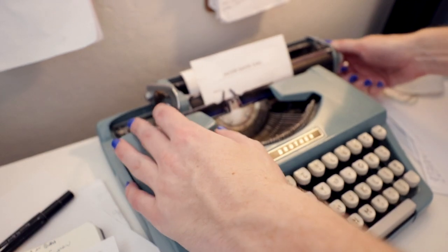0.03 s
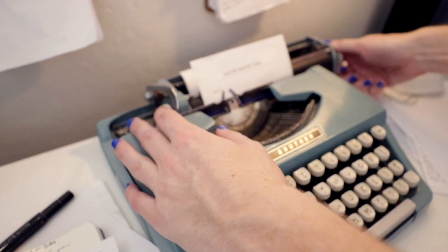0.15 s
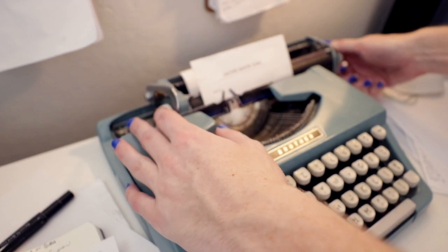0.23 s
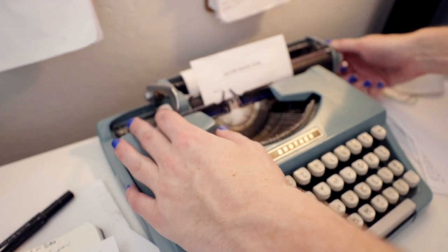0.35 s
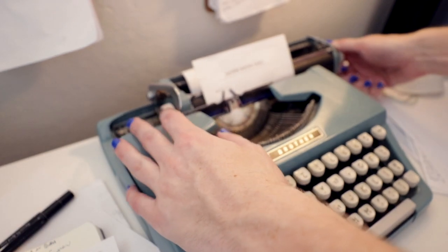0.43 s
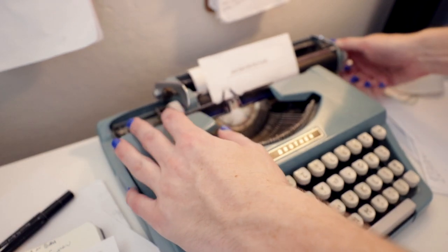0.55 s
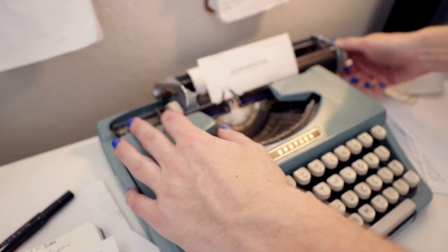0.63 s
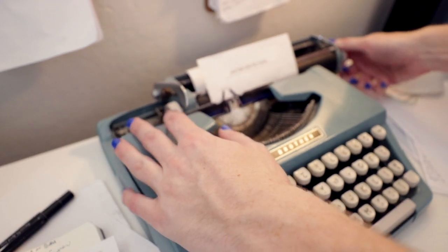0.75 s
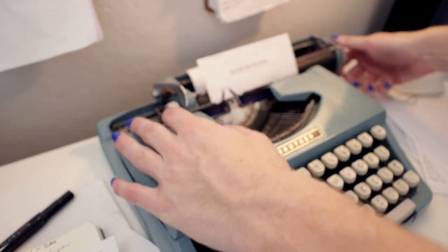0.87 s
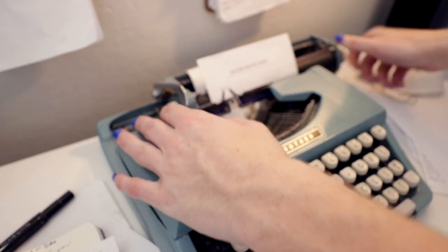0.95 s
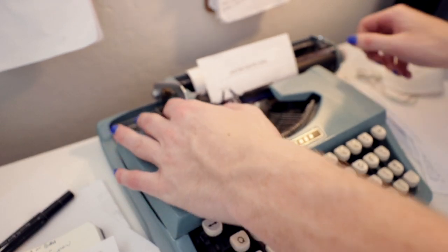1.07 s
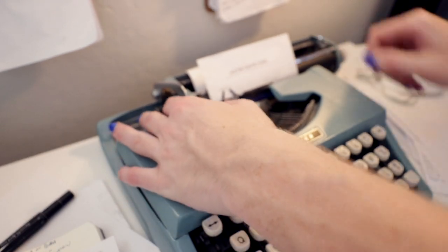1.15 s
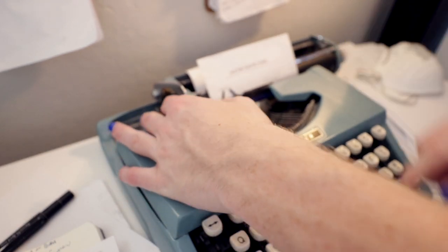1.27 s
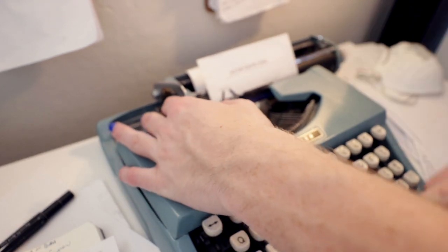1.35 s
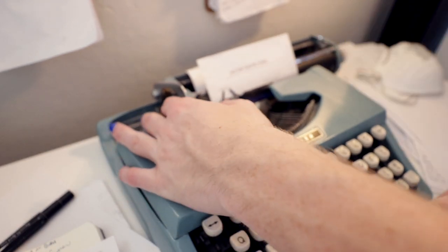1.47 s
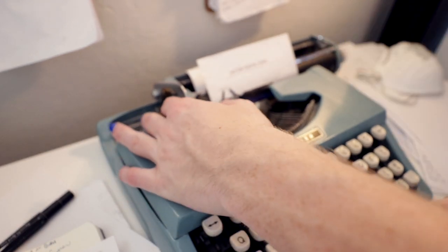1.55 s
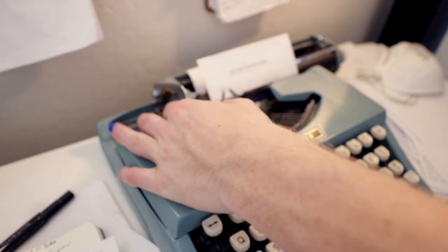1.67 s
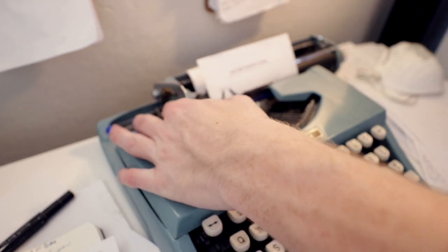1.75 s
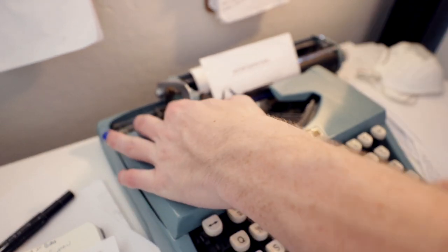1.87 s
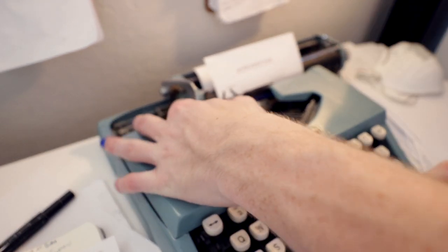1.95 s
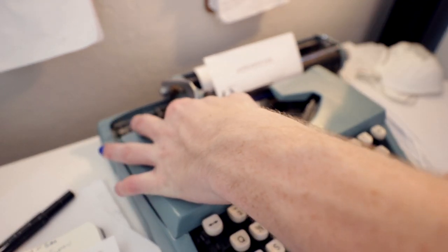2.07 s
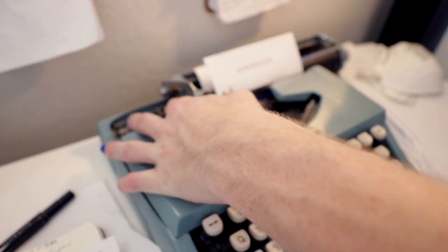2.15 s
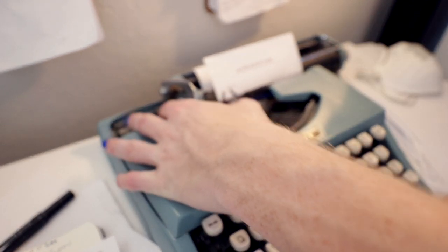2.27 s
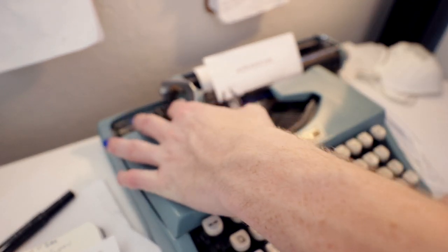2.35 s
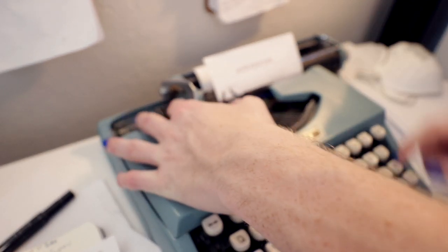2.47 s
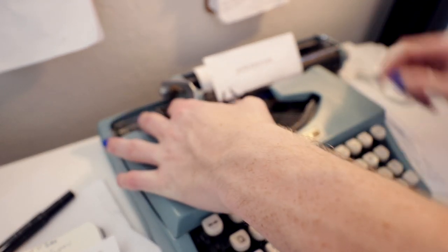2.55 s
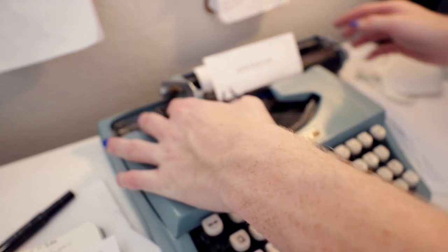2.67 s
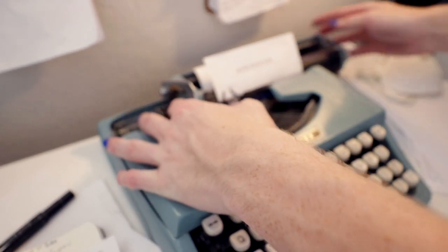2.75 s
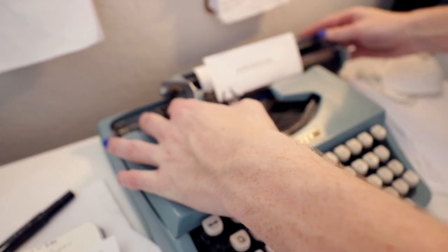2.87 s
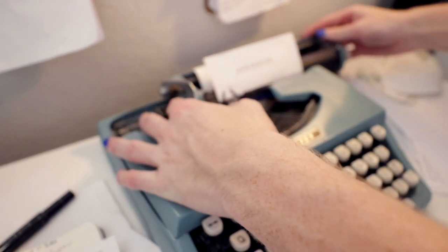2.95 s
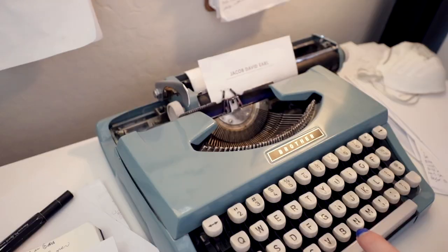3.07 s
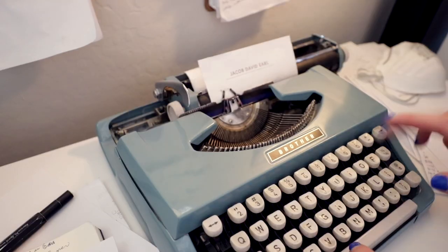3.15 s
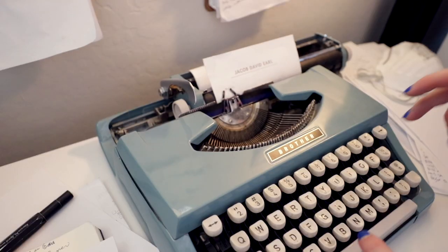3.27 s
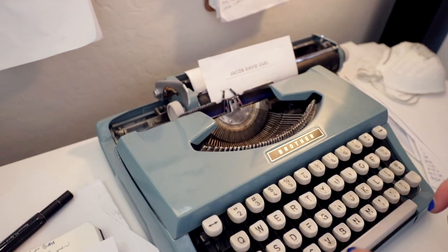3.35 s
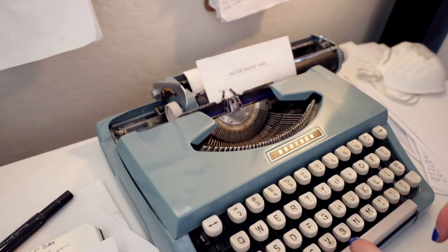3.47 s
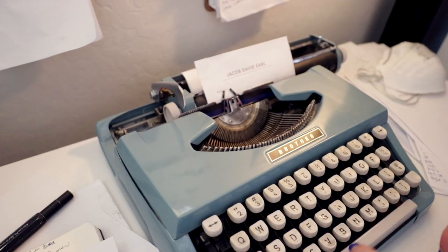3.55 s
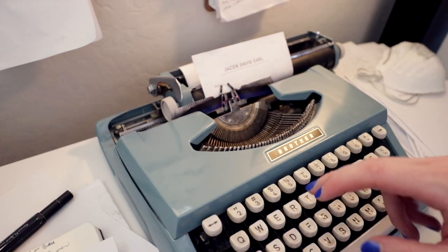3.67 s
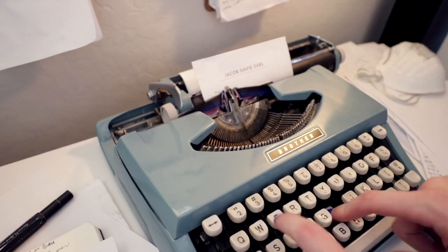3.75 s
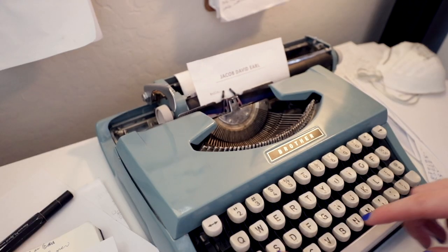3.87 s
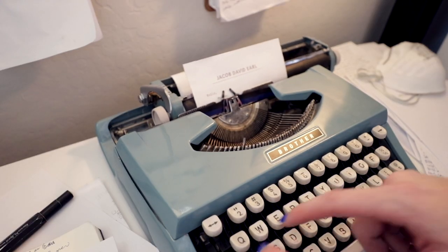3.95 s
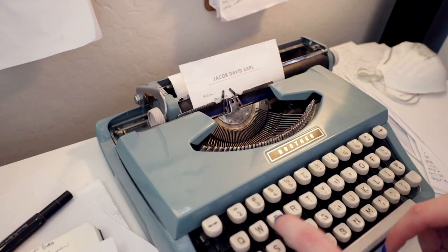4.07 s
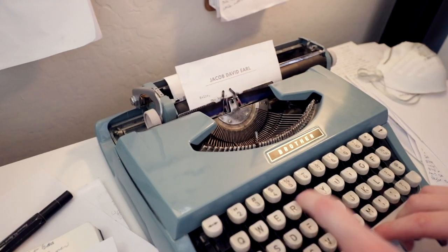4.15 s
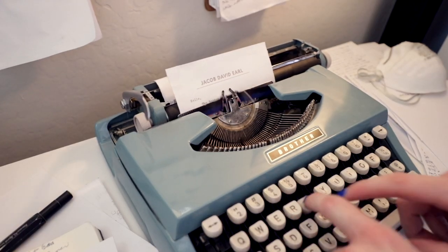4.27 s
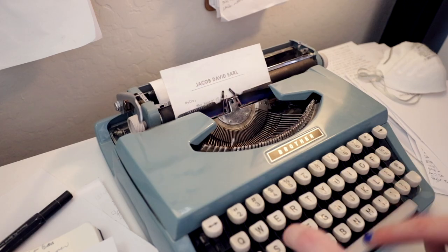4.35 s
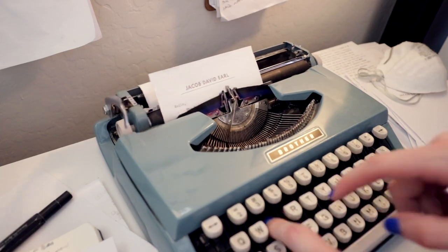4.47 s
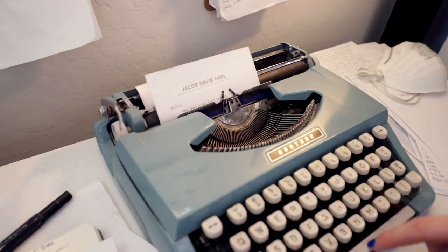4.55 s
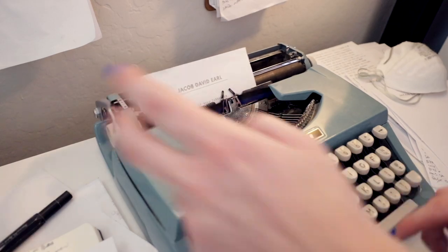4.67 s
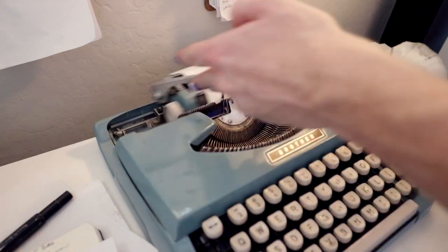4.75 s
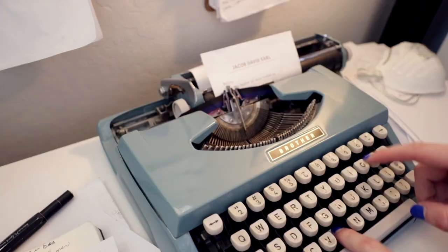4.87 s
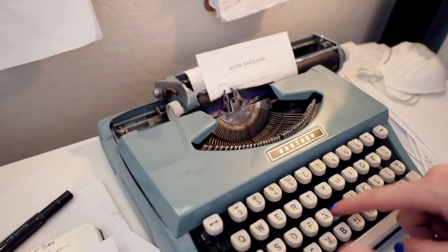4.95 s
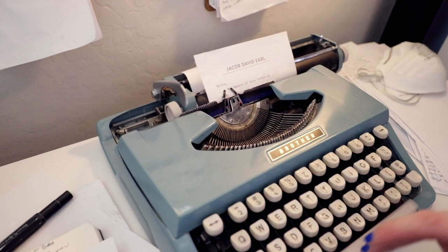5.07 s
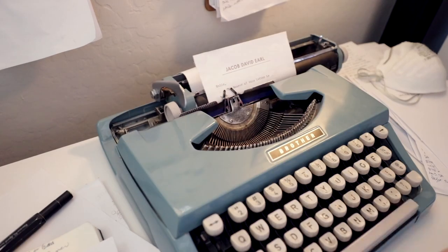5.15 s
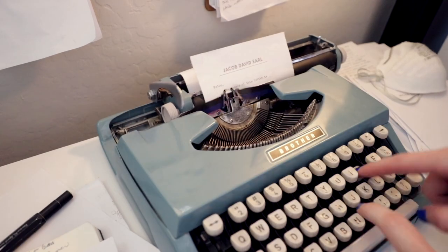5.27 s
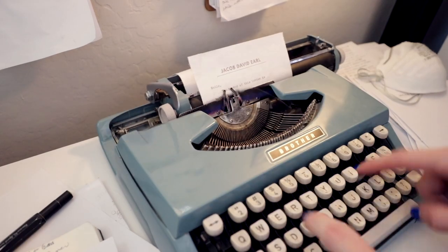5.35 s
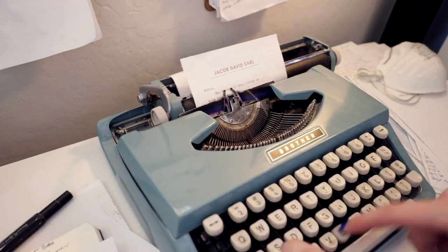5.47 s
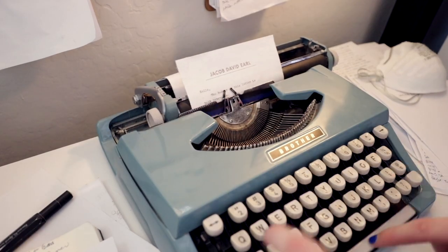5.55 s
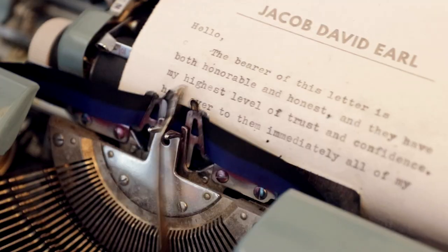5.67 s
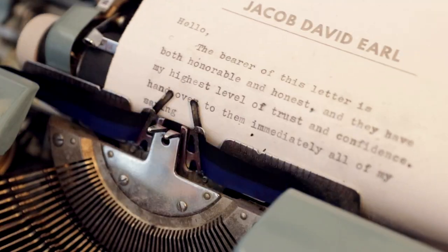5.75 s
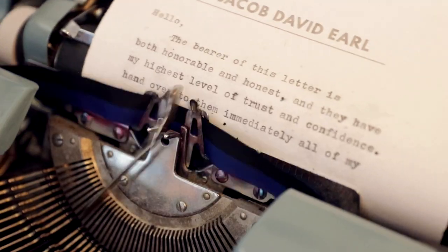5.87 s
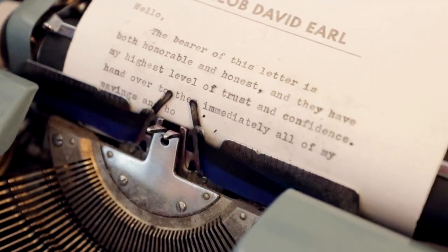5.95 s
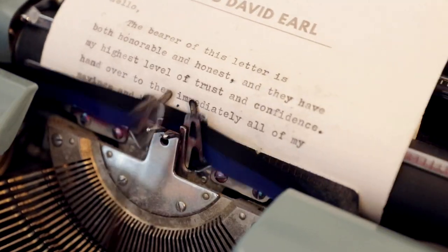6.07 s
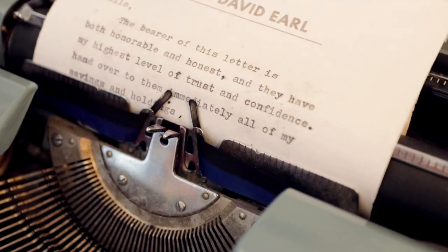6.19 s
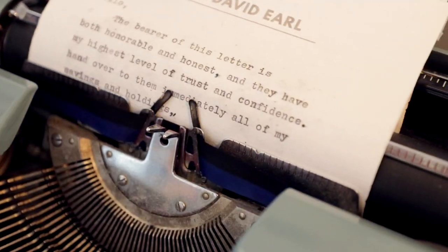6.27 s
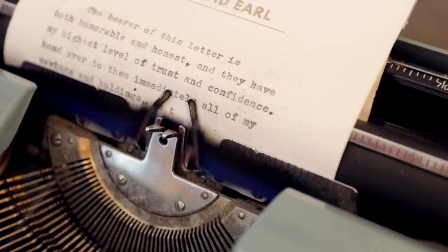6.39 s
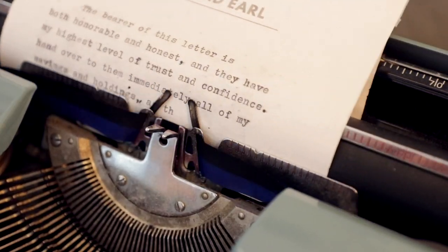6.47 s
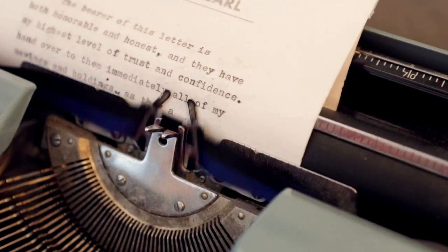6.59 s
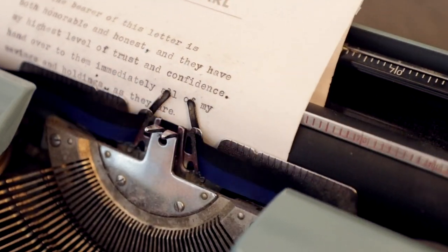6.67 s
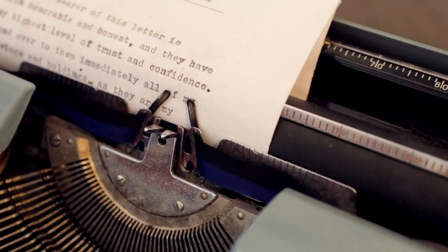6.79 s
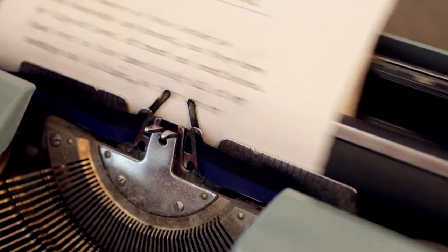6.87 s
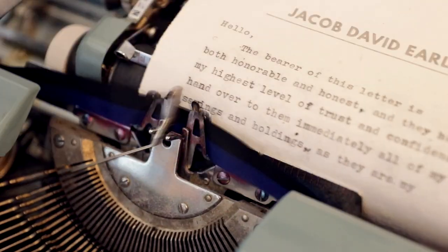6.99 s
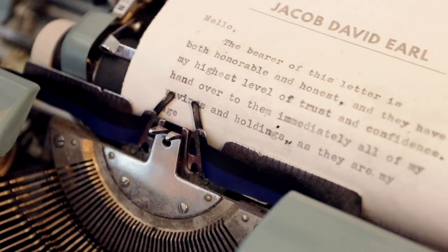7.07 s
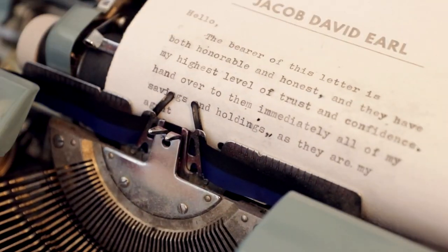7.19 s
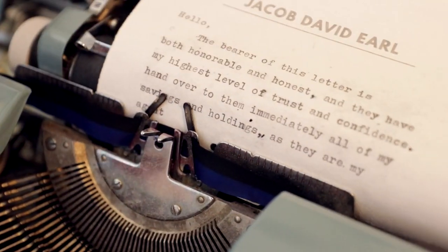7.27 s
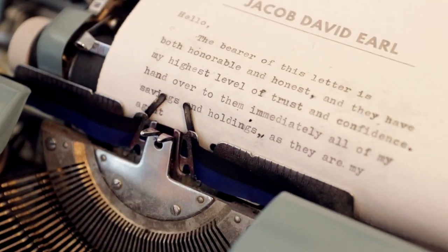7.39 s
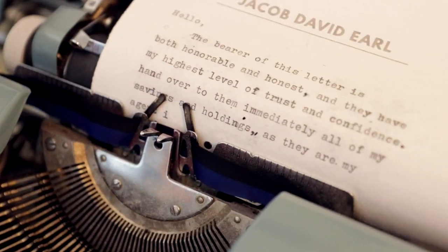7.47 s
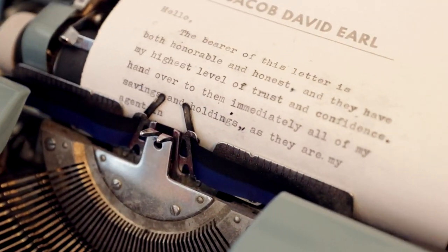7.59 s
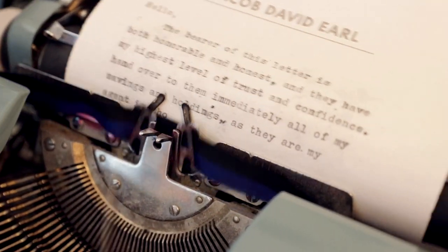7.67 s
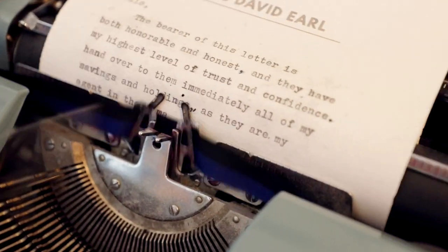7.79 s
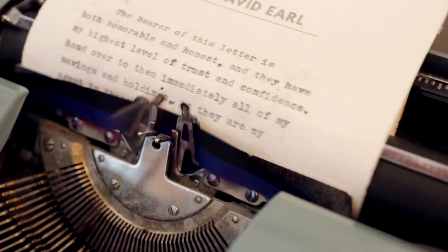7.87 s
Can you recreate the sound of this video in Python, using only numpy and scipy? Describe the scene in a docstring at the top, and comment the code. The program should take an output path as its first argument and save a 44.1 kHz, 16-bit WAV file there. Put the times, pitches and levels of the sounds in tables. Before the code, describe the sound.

Sparse clicks and carriage knocks on a small mechanical typewriter give way to rapid, uneven typing, sharp metal type bars slapping the roller.

```python
"""Low room rumble with faint hum; hands rustle and knock a manual typewriter's carriage, heard from a little
way off. Then quick runs of keys: levers chatter and springs sizzle (noise bursts), type bars slap the platen
(shaped noise bands plus struck modes), all but the room, desk, rail and spring sizzle through the frame's
resonances. The typing is spliced from short pieces, so rings stop dead at the cuts; the last pieces are heard
from beside the type basket."""
import sys
import numpy as np
from scipy import signal
from scipy.fft import rfft, irfft
from scipy.io import wavfile

SR = 44100
rng = np.random.default_rng(int(sys.argv[2]) if len(sys.argv) > 2 else 0)


def inscribe(sig):
    """Save sig as 16-bit PCM at rate SR to the path in sys.argv[1].

    A 1-D sig is mono; a 2-D sig holds one channel per row.
    Samples are clipped to [-1, 1] before scaling.
    """
    pcm = np.round(np.clip(np.atleast_2d(sig).T, -1, 1) * 32767)
    wavfile.write(sys.argv[1], SR, pcm.astype(np.int16))


N = 349713
AGE_S = np.arange(SR // 2) / SR  # time since onset, for every struck sound

# Room colour: (frequency [Hz], level [dB])
ROOM_COLOUR = [(18, -59), (30, -34.5), (56, -28), (79, 3), (127, -5.5), (221, -12.5), (404, -10.5),
               (486, -20), (526, -17.5), (889, -22), (3060, -26.5), (3490, -30), (3980, -27.5), (6210, -38),
               (16000, -50)]
# Hum and whine: (frequency [Hz], level [dB])
HUM_TONES = [(75.4, -67.5), (118.4, -67), (403.7, -72), (3709, -81), (3895, -85), (4091, -80), (7424, -94)]
# Desk booms of their own: a hand bumping the desk top, and booms with two key strokes: (time [s], level [dB])
DESK_BOOMS = [(2.838, -46), (4.511, -36), (5.5, -39)]
# Carriage rail scraping: (start [s], end [s], level the scrape swells to [dB])
RAIL_SLIDES = [(3.165, 3.328, -62), (4.764, 4.862, -61), (6.873, 7.023, -60)]
# Rail resonances: (frequency [Hz], width per filter pass [Hz], level [dB])
RAIL_MODES = [(930, 210, -13), (2260, 85, -6), (2580, 180, -12), (2680, 160, -11)]
# Frame and type basket resonances: (frequency [Hz], width [Hz], gain [dB])
FRAME_MODES = [(133.6, 45, 1.5), (278, 69, -5), (610, 79, -7.5), (843, 55, -11.5), (1040, 32, -3),
               (2060, 100, -16.5), (2566, 21, -4.5), (2970, 120, -2.5), (3144, 57, -0.5), (3963, 220, -6),
               (5080, 83, -6.5), (6630, 250, -13.5), (7460, 53, -25.5)]
# Splices where ringing stops: (time [s])
CUT_TIMES_S = [3.44, 3.486, 3.9, 3.947, 4.051, 4.1, 4.557, 4.665, 4.716, 5.016, 5.066, 5.738, 6.197, 6.35,
               6.702, 7.135, 7.196, 7.6]
# Clicks of catches, escapement, bars dropping back: (time [s], level [dB], sparkle [dB])
LONE_CLICKS = [(0.434, -37, -37), (0.656, -37.5, -11), (0.862, -40, -31), (1.142, -45.5, -16),
               (1.832, -40, -17), (1.867, -38, -21), (2.009, -30, -27), (3.299, -36.5, -0.5),
               (3.63, -38.5, -21), (3.94, -34, -12), (5.051, -36, -16), (5.062, -28.5, -9),
               (5.62, -18.5, -19), (6.343, -46, -9), (6.559, -30.5, -20), (6.791, -38.5, -9.5),
               (7.191, -43, -10), (7.685, -22, -30.5), (7.713, -31.5, -11), (7.744, -32, -22)]
# Fingers fiddling with the carriage: (start [s], end [s], rustle level [dB])
FIDDLING_SPANS = [(0, 0.073, -61), (0.411, 0.6, -65.5), (1.844, 1.962, -61.5)]
# Levers and carriage moving, no bar striking: (start [s], length [s], level [dB], spring sizzle [dB])
LEVER_MOVES = [(3.052, 0.016, -59, -15), (3.103, .24, -56, -28), (3.39, 0.065, -58, -10),
               (3.458, 0.037, -50.5, 5), (3.821, 0.066, -52.5, -5), (4.051, 0.037, -53, -18),
               (4.08, 0.019, -40.5, -12), (4.128, 0.092, -50.5, -15), (4.462, 0.056, -49.5, -8),
               (4.578, 0.015, -45, -7), (4.68, 0.026, -39, -5), (4.732, 0.021, -55, -13),
               (4.8, 0.064, -53, -28), (5.315, 0.022, -44.5, -19), (5.349, 0.034, -57.5, -20),
               (5.595, 0.074, -43.5, -14), (5.676, 0.069, -55.5, 3), (5.755, 0.031, -41, -1),
               (5.79, 0.055, -51.5, -15), (6.819, 0.029, -45.5, 3.5), (6.88, 0.13, -62.5, -27),
               (6.948, .08, -58.5, -27), (7.087, 0.049, -62, -5), (7.569, 0.018, -63, -6),
               (7.713, 0.064, -54, -18)]
# Lever chatter colour, from afar and beside the basket: (frequency [Hz], level [dB])
LINKAGE_FAR_COLOUR = [(29, -34.5), (50, -7.5), (180, -1), (472, -7.5), (1050, -1.5), (1500, -4.5),
                      (2210, -2.5), (3100, -11), (3500, -12), (3950, -11), (5670, -15.5), (10100, -21.5),
                      (13500, -22), (16000, -33.5)]
LINKAGE_CLOSE_COLOUR = [(29, -36), (50, -4.5), (252, 4), (802, 1), (1020, 5.5), (1470, 0), (2110, 1),
                        (2440, -3.5), (2750, 1), (3500, -15), (4240, -7), (8340, -15.5), (14200, -20),
                        (16000, -10)]
# Return spring colour: (frequency [Hz], level [dB])
SPRING_COLOUR = [(5000, -30), (9000, -10), (12000, -4), (14000, -1), (15800, 0)]
# Carriage, platen knob, space bar knocking the frame:
# (time [s], level [dB], thud [dB], case [dB], sparkle [dB], base ring t60 [s])
FRAME_KNOCKS = [(0.129, -29.5, -17, -13, -23.5, 0.12), (0.679, -34.5, -9.5, -15.5, -20, 0.19),
                (1.95, -18, -18.5, -14.5, -17, 0.2), (2.139, -37.5, -14, -15.5, -21, 0.11),
                (3.068, -22, -18.5, -16.5, -18, 0.17), (3.339, -24.5, -21, -19.5, -18, 0.22),
                (3.42, -24, -20.5, -15.5, -21.5, 0.082), (3.786, -27, -15.5, -13.5, -20.5, 0.16),
                (3.825, -23.5, -22.5, -9.5, -23.5, 0.08), (4.59, -14, -30.5, -21, -15.5, 0.11),
                (4.953, -31.5, -8.5, -15, -17, 0.3)]
# Long carriage modes: (frequency [Hz], mean level [dB], t60 [s])
CARRIAGE_MODES = [(86.2, -30, 0.6), (164, -11, 0.13), (628, -14.5, 0.38), (1050, -18, 0.31),
                  (1495, 4, 0.12), (1697, 4.5, 0.15), (2170, -1.5, 0.19), (2620, -35, 0.28),
                  (3070, -6.5, 0.028), (4000, -11.5, 0.38), (5050, -16, 0.27), (6600, -9, 0.17),
                  (6137, -16, 0.26), (6820, -30, 0.14)]
# Blow colour: (frequency [Hz], level [dB])
BLOW_COLOUR = [(29, -36), (50, -16), (148, -9), (472, -6), (1050, -1), (1580, -5.5), (1870, 1.5),
               (3030, -5), (3500, 0.5), (4040, -4), (4350, -4), (6870, -8), (16000, -19)]
# Edges between thud, case, steel and sparkle: (frequency [Hz])
BLOW_EDGES_HZ = [50, 400, 1500, 6000, 17000]
# Key strokes: (hit time [s], level [dB], bar pitch [Hz], after-ring [dB], key travel before hit [s],
# take-up tick [dB], linkage chatter [dB])
KEY_STRIKES = [(3.471, -13, 6500, -12, 0.025, -40, -50.5), (4.04, -16.5, 1870, -29, 0.048, -28, -42.5),
               (4.245, -17, 1886, -10, 0.014, -24, -46.5), (4.311, -13, 1680, -13, 0.024, -39, -44.5),
               (4.343, -14, 1820, -7, 0.02, -34, -48), (4.422, -15, 1866, -6.5, 0.034, -23.5, -45),
               (4.519, -13.5, 1850, -4.5, 0.027, -25, -39), (4.922, -21, 4100, -3, .027, -48, -52.5),
               (5.434, -14.5, 4130, -6, 0.032, -34, -41.5), (5.503, -14, 3980, -4.5, 0.022, -38, -48),
               (5.556, -14.5, 3990, -4, .02, -36, -48), (5.862, -21, 4060, -5, 0.036, -25, -48.5),
               (5.947, -22, 4000, -25, 0.023, -30.5, -54), (6.004, -25, 2160, -40, 0.022, -33, -53),
               (6.081, -18.5, 3030, -30, 0.03, -28.5, -51), (6.096, -21.5, 2940, -35, .01, -42, -80),
               (6.149, -25.5, 2270, -29, 0.027, -36, -55), (6.278, -18.5, 2920, -19, .028, -35.5, -44.5),
               (6.434, -20, 2917, -12, 0.046, -49, -46), (6.587, -26.5, 2400, -25, .042, -23.5, -50),
               (6.667, -14.5, 2890, -14.5, 0.036, -38, -50.5), (7.035, -18, 1930, -9.5, 0.034, -47, -56.5),
               (7.467, -23.5, 2405, -17.5, 0.0062, -38, -54),
               (7.647, -18.5, 4200, -10.5, 0.027, -42, -48.5), (7.826, -17, 2970, -9, 0.032, -39, -47),
               (7.9, -15, 3060, -12, 0.028, -25, -42.5)]

TYPING_FROM_S, CLOSE_FROM_S = 3.486, 5.745  # typing; view from beside the basket
TOP_HZ = 16000
# Room quieter under typing, quietest beside the basket
ROOM_DB, ROOM_TYPING_DB, ROOM_CLOSE_DB = -61, -5.5, -14
DESK_LAG_S, DESK_DB = 0.013, -3.5  # desk after each knock; level re its thud
RATCHET_FROM_S, TOOTH_S, TOOTH_DB = 3.203, .037, -27.5  # platen knob turned
TICK_SPARKLE_DB = -14.5  # re tick
JOLT_DB = 12.5  # tick starting a move, re its level
# Fiddling ticks and sizzle re the rustle
FIDDLE_GAP_S, FIDDLE_TICK_DB, FIDDLE_SPREAD_DB, FIDDLE_SIZZLE_DB = 0.074, 14, 3.5, -34
# Levers follow through, then fall back more quietly (re travel chatter)
FOLLOW_S, RETURN_S, RETURN_DB = 0.024, 0.037, -12
SIZZLE_FAR_DB, SIZZLE_CLOSE_DB = -10.5, -1  # before SIZZLE_TRIM_DB, as are the table values
SIZZLE_TRIM_DB = -1.5
# Soft strokes: relatively more case, less sparkle (slopes in dB per dB)
SOFT_BELOW_DB, SOFT_CASE_SLOPE, SOFT_SPARKLE_SLOPE = -20, 1.83, 0.66
CASE_DB, SPARKLE_FAR_DB, SPARKLE_CLOSE_DB = -21, -15.5, -15.5  # re a firm stroke
BAR_RING_DB, BAR_RING_S = -16.5, 0.12  # bar's note re after-ring; t60
THUD_DB, THUD_SLOPE = -21.5, 0.3  # re stroke; plus dB per dB of after-ring


def amp(db):
    """Decibels to gain."""
    return 10 ** (np.asarray(db) / 20)


def fade(t60_s, hold_s=0):
    """Exponential decay after an optional hold."""
    return np.exp(-np.log(1000) * np.maximum(AGE_S - hold_s, 0) / max(t60_s, 1e-3))


def unit(x):
    """Scale to rms 1."""
    return x / np.sqrt(np.mean(x ** 2))


def colour(x, points, lo_hz=0, hi_hz=SR):
    """Filter x to a (Hz, dB) curve between two edges, at rms 1."""
    f_hz = np.fft.rfftfreq(len(x), 1 / SR)
    hz, db = np.transpose(points)
    gain = amp(np.interp(np.log(f_hz + 1), np.log(hz), db))
    gain = gain * (f_hz >= lo_hz) * (f_hz < hi_hz)
    return unit(irfft(rfft(x) * gain, len(x)))


def resonate(x, hz, width_hz):
    """One resonance, gain 1 at its centre."""
    return signal.lfilter(*signal.iirpeak(min(hz, SR * .45), hz / width_hz, fs=SR), x)


def resonate_twice(x, hz, width_hz):
    """Two equal resonances in series: steeper skirts."""
    return resonate(resonate(x, hz, width_hz), hz, width_hz)


def add(track, start_s, sound):
    """Lay a sound in; it ends at the next splice."""
    start = max(int(start_s * SR), 0)
    later_cuts = [int(cut_s * SR) for cut_s in CUT_TIMES_S if cut_s > start_s]
    stop = min(later_cuts + [N, start + len(sound)])
    track[start:stop] += sound[:max(stop - start, 0)]


def tone(hz, t60_s):
    """One struck mode: decaying sine of random phase."""
    return np.sin(2 * np.pi * (hz * AGE_S + rng.random())) * fade(t60_s)


def loose_modes(t60_s, count):
    """Steel modes of random pitch and decay, scaled for their count."""
    draws = rng.random((count, 2))
    modes = sum(tone(1500 * 6 ** pitch, t60_s * (.5 + life)) for pitch, life in draws)
    return modes / np.sqrt(count / 2)


def dense_modes():
    """Countless close modes as noise bands: desk thud, case, steel parts, sparkle."""
    noise = rng.standard_normal(len(AGE_S))
    edges = zip(BLOW_EDGES_HZ, BLOW_EDGES_HZ[1:])
    return [colour(noise, BLOW_COLOUR, lo_hz, hi_hz) for lo_hz, hi_hz in edges]


def frame(x):
    """Resonances of the frame added to the sound of a moving part."""
    ringing = sum(amp(db) * resonate(x, hz, width_hz) for hz, width_hz, db in FRAME_MODES)
    return amp(-3.5) * (x + ringing)


def chatter(per_s, spread_db, t60_s):
    """Random tiny metal contacts of uneven size, each a short noise burst."""
    sizes = amp(spread_db * np.minimum(rng.exponential(size=N), 3))
    contacts = (rng.random(N) < per_s / SR) * sizes
    power_decay = np.exp(-2 * np.log(1000) / (t60_s * SR))
    power = signal.lfilter([1], [1, -power_decay], contacts ** 2)
    return np.sqrt(power) * rng.standard_normal(N)


def room():
    """Low rumble, a band of hiss, and hum and whine that waver, swell and sink."""
    t_s = np.arange(N) / SR
    level_db = np.select([t_s > CLOSE_FROM_S, t_s > TYPING_FROM_S], [ROOM_CLOSE_DB, ROOM_TYPING_DB], 0)
    level = amp(level_db)
    air = amp(ROOM_DB) * colour(rng.standard_normal(N), ROOM_COLOUR)
    hiss = amp(-83.5) * unit(resonate_twice(rng.standard_normal(N), 4000, 800))
    hum = 0
    for hz, db in HUM_TONES:
        drift_rad = np.cumsum(rng.standard_normal(N)) * (.035 if hz < 1000 else .012)
        swell_db = 2.5 * np.interp(t_s, np.arange(0, 9, .3), rng.standard_normal(30))
        hum = hum + amp(db + swell_db) * np.sqrt(2) * np.sin(2 * np.pi * hz * t_s + drift_rad)
    # beside the basket the hollow shell murmurs
    murmur = amp(-76.5) * unit(resonate_twice(rng.standard_normal(N), 257, 50))
    shell = murmur * (t_s > CLOSE_FROM_S)
    # hiss, hum and whine sink further than the rumble
    return air * level + (hiss + hum) * level ** 1.35 + shell


def desk():
    """The desk top booms softly in its lowest modes, just after each knock, with two key strokes, or when
    bumped."""
    out = np.zeros(N)
    knocks = [(s + DESK_LAG_S, db + thud_db + DESK_DB) for s, db, thud_db, *_ in FRAME_KNOCKS]
    for s, db in list(DESK_BOOMS) + knocks:
        boom = .7 * tone(95, .35) + tone(128, .28) + .9 * tone(163, .25) + .3 * tone(200, .2)
        add(out, s, amp(db) * boom * (1 - fade(0.14)))
    return out


def slide():
    """Dense stick-slip ticks ring the rail and swell as the carriage gathers speed."""
    out = np.zeros(N)
    slips = chatter(per_s=900, spread_db=3, t60_s=.006)
    rail = unit(sum(amp(db) * resonate_twice(slips, hz, width_hz) for hz, width_hz, db in RAIL_MODES))
    for start_s, stop_s, db in RAIL_SLIDES:
        scrape = rail[int(start_s * SR):int(stop_s * SR)]
        swell = amp(db + np.linspace(-10, 0, len(scrape)))
        add(out, start_s, scrape * swell * signal.windows.tukey(len(scrape), .1))
    return out


def ratchet(count):
    """Evenly spaced teeth pass the pawl: rows (time [s], level [dB], sparkle [dB])."""
    return [(RATCHET_FROM_S + tooth * TOOTH_S, TOOTH_DB, TICK_SPARKLE_DB) for tooth in range(count)]


def ticks():
    """Light contacts (time [s], level [dB], sparkle [dB]): clicks, teeth, key slack, jolts, fiddling."""
    rows = list(LONE_CLICKS) + ratchet(count=3)
    for s, _, _, _, travel_s, take_up_db, _ in KEY_STRIKES:
        rows.append((s - travel_s, take_up_db, TICK_SPARKLE_DB))
    rows += [(s, db + JOLT_DB, TICK_SPARKLE_DB) for s, _, db, _ in LEVER_MOVES]
    for start_s, stop_s, db in FIDDLING_SPANS:
        for s in np.arange(start_s + FIDDLE_GAP_S / 2, stop_s, FIDDLE_GAP_S):
            tick_db = db + FIDDLE_TICK_DB + FIDDLE_SPREAD_DB * rng.standard_normal()
            rows.append((s + FIDDLE_GAP_S * rng.random() / 2, tick_db, TICK_SPARKLE_DB))
    return rows


def small_parts():
    """Light pawls and levers tick and ring briefly without moving the desk."""
    out = np.zeros(N)
    for s, db, sparkle_db in ticks():
        _, case, steel, sparkle = dense_modes()
        tick = amp(-14) * steel + amp(-18) * case + amp(sparkle_db - 4) * sparkle
        rattle_out = fade(0.021) + 0.16 * fade(0.28)
        ring = sum(tone(hz * (.9 + .2 * rng.random()), .045) for hz in (1250, 1850, 2450))
        attack = 1 - fade(.002)
        add(out, s, frame(amp(db) * attack * (tick * rattle_out + amp(-20) * ring)))
    return out


def lever_motions():
    """Rows (start [s], end [s], level [dB], sizzle [dB]): moves, rustle, key travel and return."""
    rows = [(s, s + length_s, db, sizzle_db) for s, length_s, db, sizzle_db in LEVER_MOVES]
    rows += [(start_s, stop_s, db, FIDDLE_SIZZLE_DB) for start_s, stop_s, db in FIDDLING_SPANS]
    for s, _, _, _, travel_s, _, db in KEY_STRIKES:
        sizzle_db = SIZZLE_CLOSE_DB if s > CLOSE_FROM_S else SIZZLE_FAR_DB
        rows.append((s - travel_s, s + FOLLOW_S, db, sizzle_db))
        rows.append((s, s + FOLLOW_S + RETURN_S, db + RETURN_DB, sizzle_db))
    return rows


def linkage():
    """Levers chatter as they move and ring on for a moment; return springs sizzle on top."""
    out = np.zeros(N)
    contacts = frame(chatter(per_s=600, spread_db=3, t60_s=.024))
    far = colour(contacts, LINKAGE_FAR_COLOUR)
    close = colour(contacts, LINKAGE_CLOSE_COLOUR)
    jingle = chatter(per_s=420, spread_db=3.5, t60_s=.035)
    springs = colour(jingle, SPRING_COLOUR)
    for start_s, stop_s, db, sizzle_db in lever_motions():
        span = slice(max(int(start_s * SR), 0), None)
        levers = far if start_s < CLOSE_FROM_S else close
        sizzle = amp(sizzle_db + SIZZLE_TRIM_DB) * springs[span]
        motion = (levers[span] + sizzle)[:len(AGE_S)]
        travel = (1 - fade(.012)) * fade(.07, hold_s=max(stop_s - start_s - .005, 0))
        add(out, start_s, amp(db) * motion * travel[:len(motion)])
    return out


def carriage():
    """The whole carriage shudders, lows longest; the heavier the thud, the more its long modes sing."""
    out = np.zeros(N)
    for s, db, thud_db, case_db, sparkle_db, t60_s in FRAME_KNOCKS:
        thud, case, steel, sparkle = dense_modes()
        shudder = fade(t60_s) + 0.64 * fade(0.022)
        hit = amp(-12) * steel * shudder + amp(-24) * loose_modes(t60_s / 2, count=20)
        hit += amp(case_db) * case * fade(1.4 * t60_s)
        hit += amp(sparkle_db) * sparkle * (fade(0.98 * t60_s) + 0.97 * fade(0.02))
        low_thud = unit(resonate(thud, 180, 240))
        hit += amp(thud_db + 0.5) * low_thud * (1 - fade(0.071)) * fade(0.3)
        # every point of contact weights the modes differently
        song = sum(amp(mode_db + 3.1 * rng.standard_normal()) * tone(hz, ring_s)
                   for hz, mode_db, ring_s in CARRIAGE_MODES)
        hit += amp(thud_db / 2 - 15) * song
        attack = 1 - fade(.003)
        add(out, s, frame(amp(db) * hit * attack))
    return out


def type_bars():
    """Each bar scrapes into its guide, cracks on the platen, a quieter crack follows a few ms later, and it
    rings; the thud builds late."""
    out = np.zeros(N)
    for s, db, bar_hz, after_db, *_ in KEY_STRIKES:
        close = s > CLOSE_FROM_S
        softness_db = max(SOFT_BELOW_DB - db, 0)
        case_db = CASE_DB + SOFT_CASE_SLOPE * softness_db
        sparkle_db = SPARKLE_CLOSE_DB if close else SPARKLE_FAR_DB
        sparkle_db -= SOFT_SPARKLE_SLOPE * softness_db
        thud_db = THUD_DB + THUD_SLOPE * after_db
        thud, case, steel, sparkle = dense_modes()
        # ribbon and paper cushion the blow, so it builds gradually
        cushion = 1 - fade(.007 if close else .003)
        crack = fade(.012, hold_s=.003 if close else .0022)
        repeat_s, repeat_db = (.011, -14) if close else (.008, -8)
        repeat = amp(repeat_db) * np.interp(AGE_S - repeat_s, AGE_S, crack, left=0)
        contact = crack + repeat + amp(-20) * fade(0.057)
        after = amp(after_db)
        hit = amp(-9.5) * steel * np.hypot(contact, after * amp(-0.5) * fade(0.16))
        hit += amp(case_db) * case * np.hypot(contact, after * amp(3.5) * fade(0.23))
        hit += amp(sparkle_db) * sparkle * np.hypot(contact, after * fade(0.14))
        hit += amp(thud_db) * thud * (1 - fade(0.17)) * fade(0.24)
        hit += amp(-7) * tone(bar_hz, 0.024) + amp(-21) * loose_modes(0.065, count=14)
        hit += after * amp(BAR_RING_DB) * tone(bar_hz, BAR_RING_S)
        if close:  # the hollow shell hums
            hit += amp(-33.5) * tone(274, 0.24) + amp(-21.5) * tone(1030, 0.044)
        add(out, s, frame(amp(db) * hit * cushion))
        lead = AGE_S < .005
        scrape = (steel + .5 * sparkle + .5 * case)[::-1][lead] * np.linspace(.3, 1, lead.sum())
        add(out, s - .004, frame(amp(db - 19) * scrape))
    return out


def scene():
    """Room, desk and machine, summed to one channel."""
    background = room() + desk()
    mechanism = slide() + small_parts() + linkage() + carriage()
    return (background + mechanism + type_bars())[None]


def record(dry):
    """The recorder thins the deep bass, notches the presence range and cuts the top."""
    wet = signal.sosfilt(signal.butter(4, 58, "highpass", fs=SR, output="sos"), dry)
    wet = wet - .88 * resonate(wet, 3500, 420)
    return signal.sosfilt(signal.ellip(10, .2, 80, TOP_HZ, fs=SR, output="sos"), wet)


dry = scene()
out = record(dry)
inscribe(out)
```